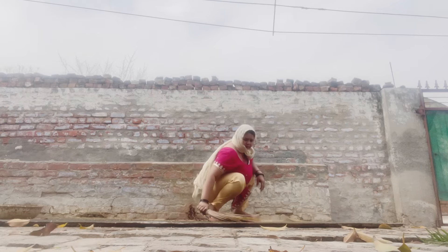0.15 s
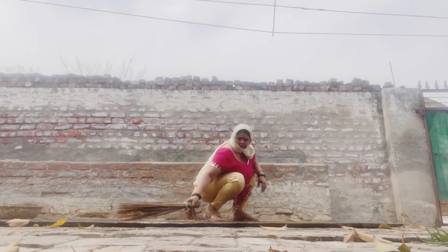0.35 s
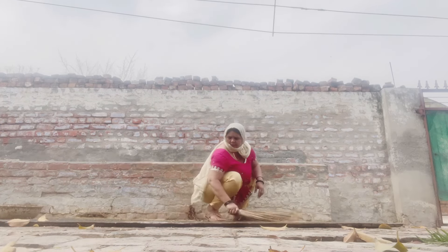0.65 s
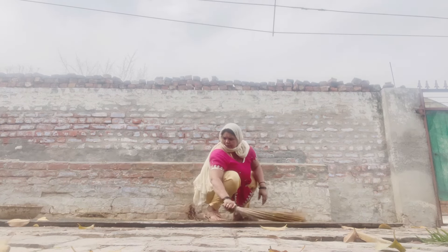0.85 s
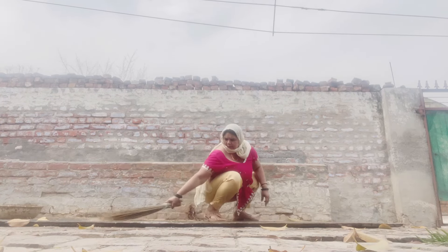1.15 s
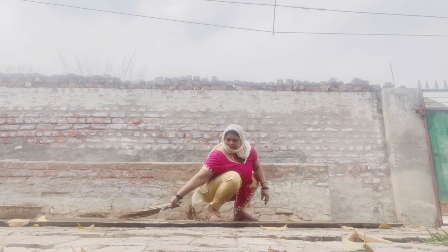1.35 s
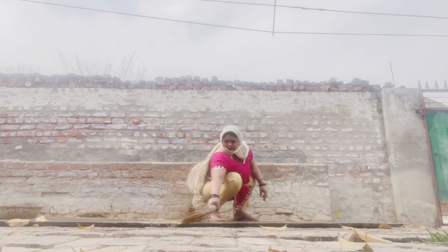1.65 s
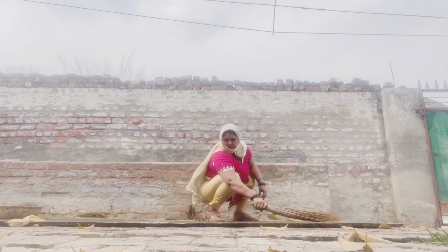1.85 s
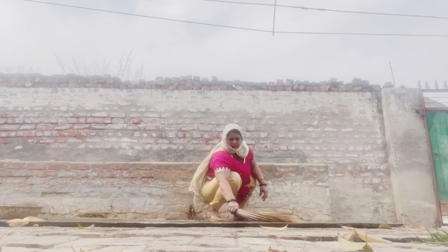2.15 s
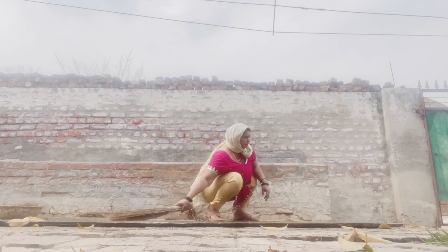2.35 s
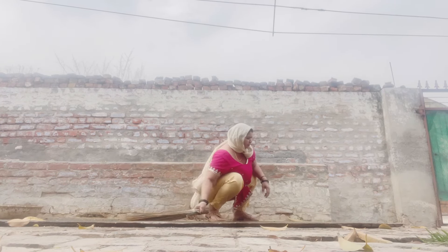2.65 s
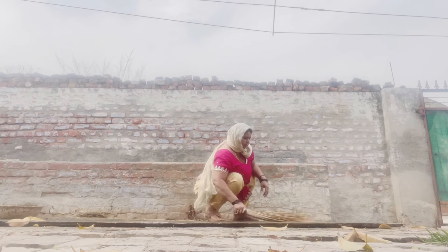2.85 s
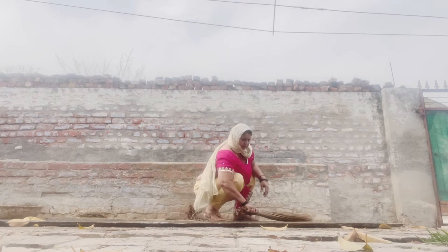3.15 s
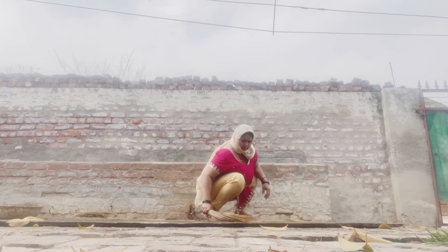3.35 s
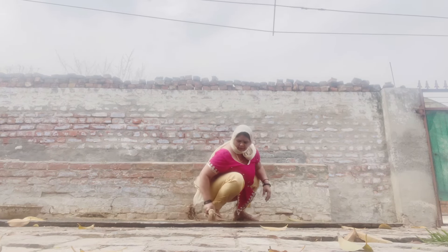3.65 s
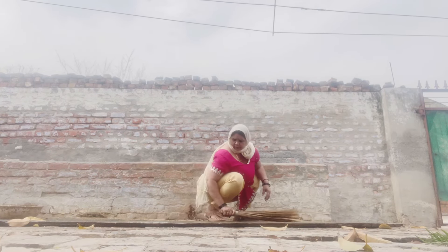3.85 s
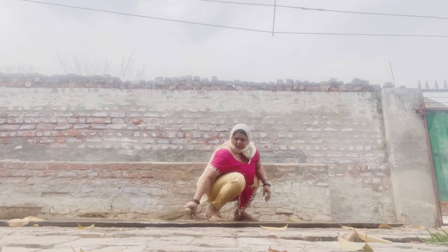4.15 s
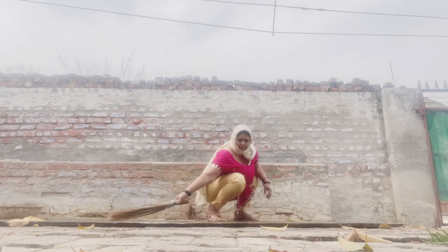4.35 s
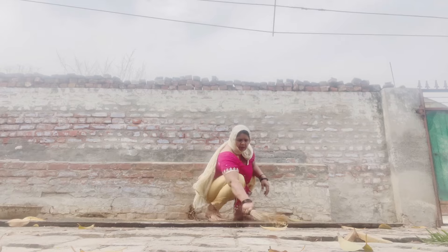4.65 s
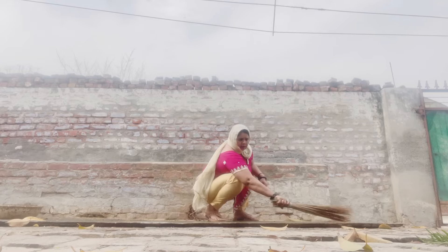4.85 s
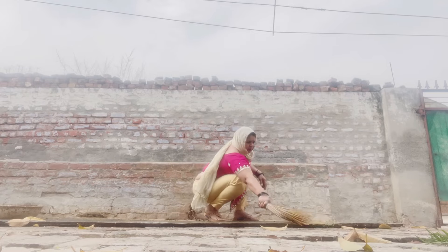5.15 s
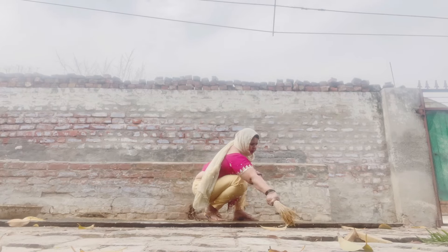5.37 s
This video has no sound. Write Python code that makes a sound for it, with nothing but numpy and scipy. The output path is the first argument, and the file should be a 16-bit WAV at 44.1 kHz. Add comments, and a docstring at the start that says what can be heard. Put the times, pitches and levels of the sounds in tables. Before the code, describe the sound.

Starting mid-stroke with a low bump and twig catch, twelve uneven scratchy sweeps follow, separated by brief soft turns. Dry bristle hiss lies over a woody, coarse scrape that shifts slightly between left and right. Occasional short knocks and soft low thumps recur over faint traffic. The brick wall adds a short, quiet echo; the microphone stands a few metres off.

```python
"""A walled yard, a few metres from a two-port microphone: far traffic rumbles while a stiff twig broom is mid-stroke.
At once a low bump and a twig catching on a joint are heard; both recur, and the brick wall answers the broom.
Twelve strokes over paving stones swing left and right: tips hiss, the bundle drones near 1 kHz, the drag is lower.
Below the high treble the broom's place sets which port hears it first; its last stroke leans to the right port.
Hiss and drones are filtered random slips and noise; catches are decaying sines with a noise click."""
import sys
import numpy as np
from scipy import signal
from scipy.fft import rfft, irfft, next_fast_len
from scipy.io import wavfile
from scipy.ndimage import uniform_filter1d, map_coordinates

SR = 44100
rng = np.random.default_rng(int(sys.argv[2]) if len(sys.argv) > 2 else 0)


def unload_audio(sound):
    """Save the sound as a 16-bit wav file, at the path given as the first command line argument."""
    columns = np.transpose(np.atleast_2d(sound))
    # keep every value between -1 and 1, then stretch to whole-number steps
    steps = np.round(np.clip(columns, -1, 1) * 32767)
    wavfile.write(sys.argv[1], SR, steps.astype(np.int16))


N = 242991
HOP = 128  # samples between short-time spectra


def amp(db):
    """dB to gain."""
    return 10 ** (np.asarray(db) / 20)


def unit(x):
    """x at rms 1."""
    return x / np.sqrt(np.mean(x ** 2) + 1e-20)


def along(points, hz):
    """Columns of (frequency, value, ..) rows, read on a log frequency axis."""
    f, *cols = np.transpose(points)
    return np.squeeze([np.interp(np.log(hz + 1), np.log(f + 1), c) for c in cols])


def curves(rows):
    """One value per sample for each column after the time."""
    s, *cols = np.transpose(rows)
    return [np.interp(np.arange(N) / SR, s, c) for c in cols]


def wobble(rate):
    """A smooth random curve, rate knots a second."""
    knots = rng.standard_normal(int(N * rate / SR) + 4)
    return map_coordinates(knots, [np.arange(N) * rate / SR])


def filtered(x, response):
    """x shaped by a response of frequency, in the spectrum."""
    m = next_fast_len(N + SR // 2)
    return irfft(rfft(x, m) * response(np.fft.rfftfreq(m, 1 / SR)), m)[..., :N]


def resonances(modes):
    """The response of a few resonances of alternating sign, passed twice for steep skirts."""
    def response(f):
        once = 0
        for k, (centre, width, db) in enumerate(modes):
            band = 1j * f * width / (centre * centre - f * f + 1j * f * width)
            once = once + (-1) ** k * amp(db / 2) * band
        return once ** 2
    return response


def peak(t, s, db, rise, fall):
    """A level in dB that climbs to db at s and sinks after it, rise and fall in dB per s."""
    return db - np.where(t < s, rise * (s - t), fall * (t - s))


def scraping(slips, spread_db, smooth):
    """Twigs slipping over rough stone: slips a second of uneven size, over smooth friction noise."""
    when, size, sign = rng.random((3, N))
    sizes = amp(-spread_db * np.log(size + 1e-4))
    grains = (when < slips / SR) * sizes * np.sign(sign - .5)
    return unit(grains) + smooth * rng.standard_normal(N)


# far traffic: (time [s], deep rumble level before trim [dB], drone level before trim [dB])
TRAFFIC = [(0.0, -53, -42), (0.49, -59.5, -53.5), (1.27, -56, -49.5), (1.53, -60, -44), (1.67, -52, -49.5),
           (1.93, -63, -53.5), (2.35, -46.5, -48.5), (2.79, -56, -49), (3.3, -45.5, -48),
           (3.45, -52, -49.5), (4.64, -47.5, -50), (5.06, -52, -50), (5.51, -51, -50.5)]
# colour of the deep rumble: (frequency [Hz], relative level [dB per Hz])
DEEP_COLOUR = [(18, -27), (30, 7), (40, 7), (52, 7.5), (63, 7), (90, 3.5), (140, -51)]
# colour of the engine drone: (frequency [Hz], relative level [dB per Hz])
DRONE_COLOUR = [(50, -6.5), (100, 1), (200, -2), (330, -5.5), (700, -11.5), (1100, -16), (1600, -20.5),
                (4000, -32.5), (7500, -67), (8500, -80)]


def traffic():
    """Far engines: slowly varying noise, a deep rumble and a higher, broader drone, partly alike at both ports."""
    deep_db, drone_db = curves(TRAFFIC)
    out = np.zeros((2, N))
    layers = ((DEEP_COLOUR, deep_db, .8, .6), (DRONE_COLOUR, drone_db, .62, 1.8))
    for colour, db, apart, left_db in layers:  # left_db is half the difference between the ports
        mid, side = filtered(rng.standard_normal((2, N)), lambda hz: amp(along(colour, hz)))
        both = unit(np.array([mid + apart * side, mid - apart * side]))
        level = amp(db + 6.5 + 2.1 * wobble(5.05))
        out += level * amp([[left_db], [-left_db]]) * both
    return out


# one row a stroke: (turn before it [s], hiss at that turn [dB], speeding up [dB per s],
#  full speed from [s], until [s], hiss from [dB], until [dB], lift-off time [s], press from [s], until [s],
#  bundle ring at first touch [dB], under the press [dB], stone drag loudest [s], its level [dB],
#  thin twigs loudest [s], their level re hiss [dB], place reached as left port's lead [microseconds]);
#  levels are before tremble and each part's trim
STROKES = [(-.06, -57, 110, 0.18, 0.3, -33.5, -30.5, 0.16, .21, 0.26, -40, -28.5, .22, -33, .16, -4.5, 160),
           (0.399, -55, 52, 0.51, 0.71, -37.5, -36.5, 0.11, .61, 0.63, -51, -28.5, .66, -34, .55, -0.5, -49),
           (0.821, -53, 48, 0.96, 1.055, -33.5, -34, .15, 1.0, 1.07, -37.5, -29, 1.0, -33, 0.904, -2.5, 185),
           (1.392, -58.5, 141, 1.627, 1.747, -33.5, -30.5, 0.13, 1.69, 1.8, -39, -27.5, 1.69, -35, 1.76, 1.5, -66),
           (2.039, -54.5, 63, 2.187, 2.26, -32, -33.5, .13, 2.23, 2.32, -43.5, -28, 2.24, -31, 2.34, 1, 188),
           (2.57, -58.5, 54, 2.83, 2.87, -34, -33.5, 0.19, 2.82, 2.92, -39, -28, 2.89, -32, 2.75, 1, -66),
           (3.17, -61.5, 99, 3.35, 3.46, -35.5, -37.5, .10, 3.39, 3.42, -38.5, -30, 3.33, -34, 3.42, -9, 127),
           (3.579, -56.5, 52, 3.64, 3.81, -40, -40, 0.16, 3.73, 3.78, -37, -30.5, 3.76, -37.5, 3.66, -1, -32),
           (3.939, -63, 56, 4.12, 4.21, -37.5, -38.5, 0.13, 4.12, 4.18, -41, -28, 4.10, -35.5, 4.21, 1, 170),
           (4.37, -63, 164, 4.58, 4.835, -31, -34, 0.1, 4.64, 4.73, -43, -25, 4.75, -33, 4.71, 1.5, -110),
           (4.958, -64.5, 46, 5.117, 5.08, -33.5, -31, .11, 5.13, 5.17, -35, -31.5, 5.08, -40, 5.22, 4.5, -36.5),
           (5.341, -58.5, 43, 5.46, 5.51, -34.5, -35, .14, 5.49, 5.53, -38, -37, 5.51, -43, 5.42, 7, -150)]
# the turn that closes the last stroke: (time [s], hiss level before trim [dB])
LAST_TURN = (5.75, -58)
LAND_S, RING_LAND_S = 0.11, 0.088  # bundle and drag set in sooner than hiss and thin twigs
CONTACT_BEND = 1.82  # exponent of the lift-off curve
LIGHT_HISS_DB = 16  # a light touch hisses at least this much over the turn
SLOWING_DB_PER_S = 39
BUNDLE_RISE_DB_PER_S, BUNDLE_SAG_DB_PER_S = 116, 22  # the sag runs from the start of the press
BUNDLE_FALL_DB_PER_S, BUNDLE_TRAIL_DB = 80, -39.5  # further fall after the press; least level from its start on
DRAG_RISE_DB_PER_S, DRAG_FALL_DB_PER_S, DRAG_LIGHT_DB = 67, 62, -43
THIN_RISE_DB_PER_S, THIN_FALL_DB_PER_S, THIN_LEAST_DB = 36, 52, -7  # least level re hiss
TURN_BUNDLE_DB, TURN_DRAG_DB, TURN_THIN_DB = -7, 2.5, -1.5  # re hiss while the broom turns


def stroke_levels():
    """Hiss, bundle, drag and thin twigs in dB: speed sets the hiss, pressure the rings, all sink at the turns."""
    t, out = np.arange(N) / SR, np.zeros((4, N))
    turns = [row[:2] for row in STROKES] + [LAST_TURN]
    land = np.array([[LAND_S], [RING_LAND_S], [RING_LAND_S], [LAND_S]])
    turn_offsets = np.array([[0], [TURN_BUNDLE_DB], [TURN_DRAG_DB], [TURN_THIN_DB]])
    for row, (end, end_db) in zip(STROKES, turns[1:]):
        (start, start_db, speeding, full_from, full_until, hiss_from, hiss_until, lift, press_from, press_until,
         touch_db, bundle_db, drag_s, drag_db, thin_s, thin_db, _) = row
        now = (t >= start) & (t < end)
        u = t[now]

        hiss = np.interp(u, [full_from, full_until], [hiss_from, hiss_until])
        hiss -= speeding * np.clip(full_from - u, 0, 1)
        hiss -= SLOWING_DB_PER_S * np.clip(u - full_until, 0, 1)
        hiss = np.where(u < full_from, np.maximum(hiss, start_db + LIGHT_HISS_DB), hiss)

        pressed = peak(u, press_from, bundle_db, BUNDLE_RISE_DB_PER_S, BUNDLE_SAG_DB_PER_S)
        pressed -= BUNDLE_FALL_DB_PER_S * np.clip(u - press_until, 0, 1)
        bundle = np.maximum(pressed, np.where(u < press_from, touch_db, BUNDLE_TRAIL_DB))

        drag = peak(u, drag_s, drag_db, DRAG_RISE_DB_PER_S, DRAG_FALL_DB_PER_S)
        drag = np.maximum(drag, DRAG_LIGHT_DB)

        thin = peak(u, thin_s, thin_db, THIN_RISE_DB_PER_S, THIN_FALL_DB_PER_S)
        thin = hiss + np.maximum(thin, THIN_LEAST_DB)

        # 1 at a turn, 0 in full contact
        lifted = np.maximum(1 - (u - start) / land, 1 - (end - u) / lift)
        lifted = np.clip(lifted, 0, 1) ** CONTACT_BEND
        turn_db = np.where(u < full_from, start_db, end_db) + turn_offsets
        out[:, now] = (1 - lifted) * np.array([hiss, bundle, drag, thin]) + lifted * turn_db
    return out


# hiss colour of the twig tips: (frequency [Hz], relative level [dB per Hz])
TIPS_COLOUR = [(1200, -19.5), (2300, -3.5), (2900, -2.5), (4300, -1.5), (5500, -1.5), (6600, -2.5),
               (7600, -2.5), (9000, -2.5), (11500, -9.5), (14000, -12), (15800, -6.5)]


def twig_tips():
    """Tips skipping over grit: dense slips with a broad treble hiss."""
    slips = scraping(slips=2500, spread_db=2.5, smooth=2.14)
    return unit(filtered(slips, lambda hz: amp(along(TIPS_COLOUR, hz))))


# bundle ring under any touch: (frequency [Hz], width of one pass [Hz], relative level [dB])
TOUCH_RING = [(1069.6, 188, 4.5)]
# broad ring that joins as the broom is pressed: (frequency [Hz], width of one pass [Hz], relative level [dB])
PRESSED_RING = [(700, 313, -4), (1017, 426, -1), (1278, 250, -1.5)]


def bundle_ring(bundle_db):
    """The bound twigs ring from the slips; a broad ring takes a larger share as the force grows."""
    slips = scraping(slips=1300, spread_db=1.5, smooth=1.0)
    press = np.clip((bundle_db + 50.5) / 14, .15, .9)
    touch = unit(filtered(slips, resonances(TOUCH_RING)))
    pressed = unit(filtered(slips, resonances(PRESSED_RING)))
    return np.sqrt(1 - press) * touch + np.sqrt(press) * pressed


# low drag over stone: (frequency [Hz], width of one pass [Hz], relative level [dB])
DRAG_RING = [(305.3, 78, 4), (528, 206, 5)]


def stone_drag():
    """Sparse slips ring low as the broom drags over stone."""
    return unit(filtered(scraping(slips=740, spread_db=2.0, smooth=0.97), resonances(DRAG_RING)))


# thin twigs above the bundle: (frequency [Hz], width of one pass [Hz], relative level [dB])
THIN_RING = [(1417, 810, 4), (2263, 730, -0.5)]


def thin_twigs():
    """Thin twigs ring broadly above the bundle, driven by very uneven slips."""
    return unit(filtered(scraping(slips=1200, spread_db=3.5, smooth=2.25), resonances(THIN_RING)))


def strokes():
    """The parts of the broom sound under each stroke; the pressure on the stone trembles."""
    hiss_db, bundle_db, drag_db, thin_db = stroke_levels()
    tremble = wobble(35) + 1.4 * wobble(14)
    # each part: stroke level, trim, random tremble
    tips = amp(hiss_db + 2.52 + 0.34 * tremble) * twig_tips()
    bundle = amp(bundle_db - 1.04 + 1.18 * tremble) * bundle_ring(bundle_db)
    drag = amp(drag_db - 2.73 + 0.88 * wobble(16)) * stone_drag()
    thin = amp(thin_db - 2.33 + 0.7 * tremble) * thin_twigs()
    return tips + bundle + drag + thin


def patchy(x, depth_db):
    """Different twigs bite at each moment, so regions of pitch swell and fade at random."""
    z = signal.stft(x, nperseg=4 * HOP)[2]
    field = uniform_filter1d(rng.standard_normal(z.shape), size=5, axis=0)
    field = uniform_filter1d(field, size=6, axis=1)
    return signal.istft(z * amp(depth_db * unit(field)), nperseg=4 * HOP)[1][:N]


# dull low bumps, perhaps feet shifting on the ground: (time [s], level before trim [dB], pitch [Hz])
BUMPS = [(0.002, -27, 153), (0.039, -43, 64.6), (1.505, -30.5, 102), (1.552, -35, 111), (2.101, -34, 46.3),
         (2.19, -30.5, 64), (2.753, -59, 68), (2.919, -35, 68), (3.1, -33, 56.3), (3.259, -40, 59.2),
         (3.554, -35.5, 53), (3.789, -30.5, 61.5), (4.069, -37, 51.1), (4.4, -45, 79.4),
         (4.776, -32, 48.43), (5.163, -30.5, 60)]
BUMP_T60_CYCLES, BUMP_SWELL_CYCLES = 9, 0.61  # fall by 60 dB; time constant of the attack
BUMP_LEFT_DB, BUMP_LEAD_RAD = 1.5, 0.6  # each port's half of the difference


def bumps():
    """Each bump is a low push that dies in a few cycles, a little out of step between the ports."""
    out, t = np.zeros((2, N + SR)), np.arange(SR // 4) / SR
    side = np.array([[1], [-1]])
    for s, db, hz in BUMPS:
        fade = amp(db + 8.5 + BUMP_LEFT_DB * side - 60 * t * hz / BUMP_T60_CYCLES)
        swell = 1 - np.exp(-t * hz / BUMP_SWELL_CYCLES)
        push = np.sin(2 * np.pi * hz * t + BUMP_LEAD_RAD * side)
        out[:, round(s * SR):][:, :len(t)] += fade * swell * push
    return out[:, :N]


# twigs catch on a joint and let go:
#  (time [s], level before trim [dB], pitch [Hz], click level re that level [dB])
CATCHES = [(0.003, -22, 2220, -27), (0.216, -18, 940, -17), (1.025, -29, 1100, -22),
           (1.73, -17.5, 1091, -27), (2.63, -27.5, 1030, -18), (2.674, -26.5, 1034, -12),
           (2.73, -28, 1590, -15), (2.819, -32, 825, -18), (2.862, -22, 489.9, -25), (2.945, -33, 480, -25),
           (3.012, -26, 490, -29), (3.209, -34, 956, -21), (3.735, -29, 1080, -22), (4.547, -41, 940, -10),
           (5.128, -25, 1330, -20), (5.232, -26, 1190, -20), (5.412, -27, 1050, -18),
           (5.495, -25, 1200, -20)]
# ringing of a released twig: (multiple of the pitch [ratio], mean level [dB], fall by 60 dB [s])
TWIG_MODES = [(.78, 0, 0.028), (0.998, 3.5, 0.037), (1.12, -0.5, 0.038), (1.9, -2, 0.02)]


def catches():
    """Each release swells for a moment, rings the twigs at new strengths and starts with a short click."""
    out, t = np.zeros(N + SR), np.arange(SR // 10) / SR
    for s, db, hz, click_db in CATCHES:
        ring = 0
        for multiple, level, t60 in TWIG_MODES:
            fade = amp(level + rng.normal(0, 3.1) - 60 * t / t60)
            ring = ring + fade * np.sin(2 * np.pi * multiple * hz * t)
        swell = 1 - np.exp(-t / 0.0022)
        click = amp(click_db - 60 * t / 0.0064) * np.diff(rng.standard_normal(len(t) + 1))
        out[round(s * SR):][:len(t)] += amp(db - 2.5) * (ring * swell + click)
    return out[:N]


# how the walled yard dies away: (frequency [Hz], fall by 60 dB [s])
YARD = [(300, 0.28), (2000, 0.33), (6000, 0.031)]


def yard(x):
    """The walls' answer, 400 samples late: a noise tail in which each frequency dies at its own speed."""
    hz, t, z = signal.stft(rng.standard_normal(SR // 2), SR, nperseg=256)
    fade = amp(-60 * t / along(YARD, hz)[:, None])
    tail = signal.istft(z * fade, SR, nperseg=256)[1]
    return signal.fftconvolve(np.pad(x, (400, 0)), tail / np.linalg.norm(tail))[:N]


FIRST_PLACE_US, SWING_S = -48, 0.22  # place at the start; time to cross the arc


def arc(t):
    """The broom's place in microseconds of left lead: it swings across around each press and waits there."""
    rows = np.array(STROKES)
    press, ends = rows[:, 8:10].mean(axis=1), rows[:, -1]
    steps = np.diff(ends, prepend=FIRST_PLACE_US)
    swings = sum(step * np.clip((t - s) / SWING_S + .5, 0, 1) for s, step in zip(press, steps))
    return FIRST_PLACE_US + swings


# the two ports below the high treble: (frequency [Hz], left minus right [dB],
#  more of it per 100 microseconds of arc [dB], left's lead [radians], likeness [0 to 1])
PORTS = [(189, 7, 11.5, -2, 0.1), (485, 6.5, -2.1, 1, 0.18), (1080, 1, 4, -0.44, 0.69),
         (1380, -3.5, 3, -0.12, 0.67), (2150, 2, -0.5, -0.36, 0.4), (2580, 1, 0.2, 1, 0.17),
         (4050, 6.5, -0.2, -0.22, 0.62), (5480, -1, 0.5, -0.45, 0.23), (6800, -2.5, 1, 1, 0.32)]
# the high treble has a fixed stereo phase, stepping with frequency, that does not follow the broom:
#  (frequency [Hz], left's lag [half turns])
TREBLE_LAG = [(6900, .3), (8400, 1), (9500, 1), (11100, 2), (12300, 2), (13400, 3), (15000, 3),
              (15800, 3.5)]


def ports(x):
    """Below the high treble the broom's place sets level and delay; scattered sound reaches the ports unalike."""
    hz, t, z = signal.stft(x, SR, nperseg=4 * HOP, noverlap=3 * HOP)
    tilt_db, shadow_db, lead, alike = along(PORTS, hz)[:, :, None]
    place = arc(t)
    turn = lead + 2 * np.pi * hz[:, None] * place * 1e-6
    treble = hz[:, None] > TREBLE_LAG[0][0]
    lag = np.pi * along(TREBLE_LAG, hz)[:, None]
    # left and right each take half of the difference
    half_db = np.where(treble, 0, tilt_db + shadow_db * place / 100) / 2
    half_turn = np.where(treble, -lag, turn) / 2
    alike = np.where(treble, 1 - 1.57 * np.sin(lag) ** 2, alike)  # treble likeness depends on the fixed phase
    scatter = z * np.exp(2j * np.pi * rng.random(z.shape))  # same strength, unrelated phase
    mix = np.arccos(np.clip(alike, 0, 1)) / 2
    direct, spread = np.cos(mix) * z, 1.53 * np.sin(mix) * scatter
    left = (direct + spread) * amp(half_db) * np.exp(1j * half_turn)
    right = (direct - spread) / amp(half_db) * np.exp(-1j * half_turn)
    return signal.istft(np.array([left, right]), SR, nperseg=4 * HOP, noverlap=3 * HOP)[1][:, :N]


def scene():
    """Broom and wall echo in stereo, over the traffic and low bumps."""
    broom = patchy(strokes(), depth_db=1.38) + catches()
    echo = amp(-17) * yard(broom)
    return ports(broom + echo) + traffic() + bumps()


TOP_HZ, BASS_CORNER_HZ = 15750, 40


def record(dry):
    """The microphone loses the deepest bass; the recorder keeps nothing above its band limit."""
    def response(hz):
        bass = (hz / BASS_CORNER_HZ) ** 4 / np.sqrt(1 + (hz / BASS_CORNER_HZ) ** 8)
        return (hz < TOP_HZ) * bass
    return filtered(dry, response)


dry = scene()
out = record(dry)
unload_audio(out)
```